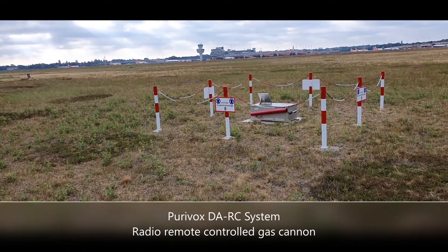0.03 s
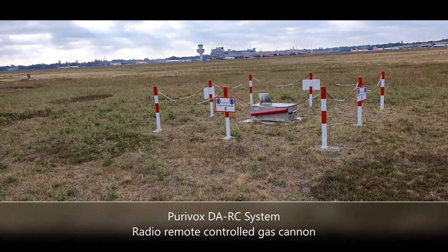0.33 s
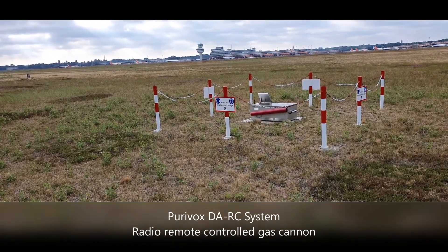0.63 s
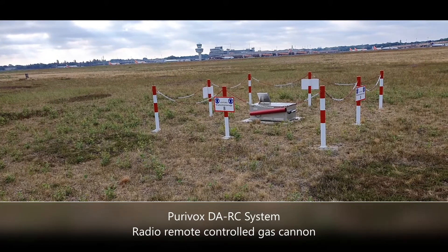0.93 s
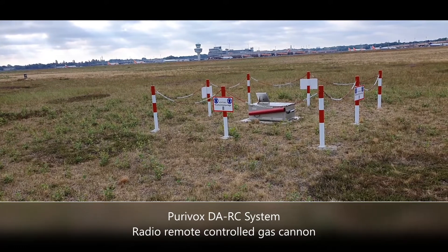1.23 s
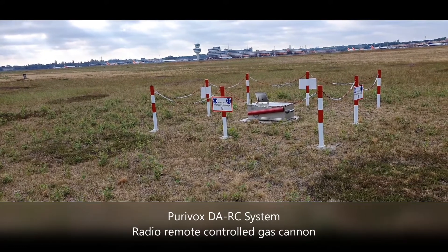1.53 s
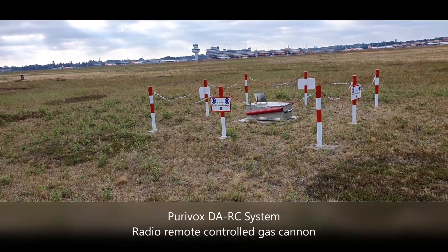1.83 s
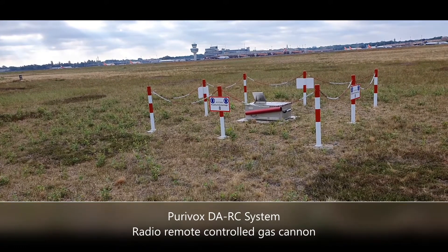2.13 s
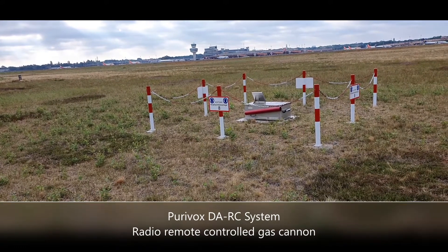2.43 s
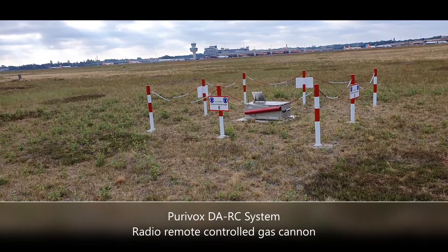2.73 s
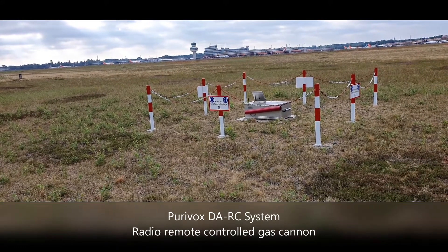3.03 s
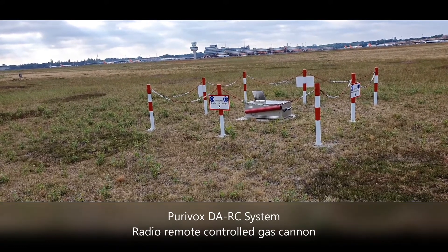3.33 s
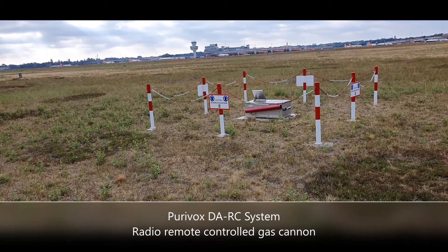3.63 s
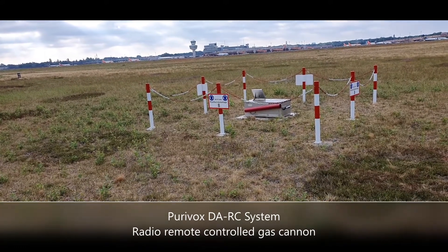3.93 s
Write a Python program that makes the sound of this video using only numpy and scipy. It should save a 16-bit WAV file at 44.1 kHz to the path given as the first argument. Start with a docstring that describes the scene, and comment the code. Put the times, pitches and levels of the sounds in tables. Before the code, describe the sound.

A gas cannon fires one loud bang outdoors, after wind rumble and faint hissing.

```python
"""A gas cannon fires once on an open airfield, a few metres away. A valve clicks and gas hisses into the
barrel; ignition puffs, a shock wave cracks, the air column booms and the steel rings in its normal modes.
Ground and nearby objects reflect the bang, which overloads the microphone and lowers a limiter's gain.
The valve opens again and gas flows. Turbulent wind buffets the microphone over a far roar and a bird."""
import sys
import numpy as np
from scipy import signal
from scipy.fft import rfft, irfft
from scipy.io import wavfile
from scipy.ndimage import uniform_filter1d, minimum_filter1d

SR = 44100
rng = np.random.default_rng(int(sys.argv[2]) if len(sys.argv) > 2 else 0)


def log_audio(samples):
    """Write samples as a 16-bit WAV file to the path given in sys.argv[1]."""
    # one column per channel
    frames = np.atleast_2d(samples).T
    # limit to full scale, then quantise
    limited = np.clip(frames, -1, 1)
    pcm = np.round(limited * 32767).astype(np.int16)
    wavfile.write(sys.argv[1], SR, pcm)


N = 176400
T = np.arange(N) / SR
FIRE_S = 3.2593  # arrival of the shock


def undb(db):
    """Amplitude ratio of a level in decibels."""
    return 10 ** (np.asarray(db) / 20)


def pan(db):
    """Stereo gains for a level difference, left minus right."""
    return undb(np.array([[db], [-db]]) / 2)


def noise(gain, coherent_hz):
    """Spectrally shaped stereo noise of unit rms; the channels lose coherence above coherent_hz."""
    f = np.arange(N // 2 + 1) * SR / N + 1e-3
    coherence = 1 / (1 + (f / coherent_hz) ** 2)
    mid, side = rfft(rng.standard_normal((2, N))) * gain(f)
    x = irfft(mid * np.sqrt(1 + coherence) + side * np.sqrt(1 - coherence) * np.array([[1], [-1]]), N)
    return x / np.sqrt(np.mean(x ** 2))


def spectrum(points):
    """Spectral envelope through (frequency [Hz], level [dB]) points, falling 12 dB per octave outside."""
    hz, db = np.array(sorted(points)).T
    return lambda f: (undb(np.interp(np.log(f), np.log(hz), db))
                      * np.minimum(f / hz[0], 1) ** 2 * np.minimum(hz[-1] / f, 1) ** 2)


def resonance(f, hz, width):
    """Magnitude response of a damped resonator."""
    return 1 / np.hypot(1, (f * f - hz * hz) / (f * width))


def flutter(per_s):
    """Smooth random fluctuation of unit standard deviation."""
    hold = int(SR / per_s)
    steps = np.repeat(rng.standard_normal(N // hold + 1), hold)
    x = uniform_filter1d(uniform_filter1d(steps, hold), hold)[:N]
    return x / x.std()


def decay(start, t60, attack=.00034):
    """Quick rise, then exponential damping by 60 dB in t60 seconds."""
    age = np.maximum(T - start, 0)
    return (1 - np.exp(-age / attack)) * np.exp(-np.log(1000) * age / t60)


def swell(at, width):
    """Gaussian envelope."""
    return np.exp(-((T - at) / width) ** 2)


def delay(x, seconds):
    """Propagation delay of one channel."""
    return np.interp(T - seconds, T, x)


def ring(modes, start):
    """Free vibration: damped modes excited together, neighbours in opposite phase."""
    return sum((-1) ** k * undb(db) * decay(start, t60, attack=.0002)
               * np.sin(2 * np.pi * hz * (T - start)) for k, (hz, db, t60) in enumerate(modes))


def snaps(rows):
    """Damped bursts of band noise, from the right."""
    return pan(-3.5) * sum(undb(db) * decay(at, t60) * noise(lambda f: resonance(f, hz, .25 * hz), 2500)
                           for at, db, hz, t60 in rows)


def blast(start, length):
    """Friedlander wave: an overpressure of the given length sinks into a longer suction."""
    age = np.maximum(T - start, 0) / length
    return uniform_filter1d((T > start) * (1 - age) * np.exp(-age), size=6)


PUFF_S, PUFF_WIDTH_S, SHOCK_LENGTH_S = 3.2464, .0014, .00047
# modes of the barrel's air column (frequency [Hz], level [dB], T60 [s])
BARREL_MODES = [(68.2, 1.5, 0.125), (146, 12, 0.042), (247, -1.5, .1), (570, -1, 0.036), (1187, -1, 0.046),
                (1404, -6, 0.043), (2270, -10, .06)]
# deep swing of the displaced air (frequency [Hz], level [dB], T60 [s])
THUMP_MODES = [(42, -9.5, .17)]


def muzzle_blast():
    """Sudden expansion: ignition pushes air ahead of a shock, which excites the barrel's air column."""
    u = (T - PUFF_S) / PUFF_WIDTH_S
    puff = undb(-12.5) * (u * u - 1) * np.exp(-u * u / 2)
    shock = undb(18) * blast(FIRE_S, SHOCK_LENGTH_S)
    rebound = undb(-9) * blast(3.2627, length=.004)  # the collapsing gas springs back
    boom = ring(BARREL_MODES, FIRE_S + SHOCK_LENGTH_S) - ring(THUMP_MODES, FIRE_S + SHOCK_LENGTH_S)
    front = puff + shock + rebound + boom
    return np.array([delay(front, .00004), front])  # the right microphone port is nearer


# turbulence at the muzzle (frequency [Hz], relative spectral level [dB])
CRACK_SPECTRUM = [(450, -7), (780, -25), (1300, -6.5), (2200, -11), (2900, -18.5), (4200, -11),
                  (6500, -14.5), (8000, -28), (11500, -25), (15500, -31)]


def muzzle_crack():
    """Turbulent gas radiates noise that interferes with its inverted reflection from soft ground."""
    rush = undb(-9) * np.exp(-np.abs(T - FIRE_S) / .00063)
    sizzle = undb(-47) * swell(PUFF_S + PUFF_WIDTH_S, .005)  # burning gas behind the puff
    tail = undb(1.5) * decay(FIRE_S, t60=.031)
    direct = (rush + sizzle + tail) * noise(spectrum(CRACK_SPECTRUM), coherent_hz=3000)
    reflected = undb(-3.5) * np.array([delay(channel, .00115) for channel in direct])
    return (direct - reflected) * pan(-5.3)


# modes of the steel wall (frequency [Hz], level [dB], T60 [s])
STEEL_MODES = [(315, -33, .55), (1139, -57, 2.7), (1166, -58, 2.8), (1588, -55, .7), (3235, -41.5, .5),
               (3266, -31, 0.63)]


def barrel_steel():
    """Impulse excitation: the shot leaves the lightly damped steel ringing."""
    return ring(STEEL_MODES, FIRE_S) * pan(-2)


# sound scattered by the ground (frequency [Hz], relative spectral level [dB])
SCATTER_SPECTRUM = [(95, -16), (135, 2), (220, 0.5), (380, -14), (740, -17), (906, -12.5), (1330, -23),
                    (2210, -14.5), (3890, -22), (5390, -18.5), (6020, -25.5), (15500, -34)]


def ground_scatter():
    """Diffuse scattering: patches of ground return the bang as a rough tail."""
    tail = undb(.3) * decay(FIRE_S, t60=.168, attack=.025)
    scattered = noise(spectrum(SCATTER_SPECTRUM), coherent_hz=2000) * pan(-1.5)
    return tail * scattered * undb(2.5 * flutter(per_s=700))


# posts, signs and housing (time [s], level [dB], centre frequency [Hz], T60 [s])
NEAR_ECHOES = [(3.2641, -8.5, 4460, .012), (3.2867, -6.5, 2900, .03), (3.3098, -11.5, 2357, .025),
               (3.3184, -6, 5070, .016), (3.3315, -20, 5000, .02)]
# returns from across the field (time [s], level [dB])
DISTANT_ECHOES = [(3.465, -21), (3.606, -37), (3.865, -41)]


def echoes():
    """Reflection: near objects answer sharply; distant returns come late and dull, adding in power."""
    near = snaps(NEAR_ECHOES)
    power = sum((undb(db) * decay(at, t60=.14, attack=.0034)) ** 2 for at, db in DISTANT_ECHOES)
    dull = noise(lambda f: resonance(f, hz=120, width=150) ** 3, coherent_hz=600)
    return near + np.sqrt(power) * dull


# reverberation of the field (frequency [Hz], relative spectral level [dB])
ROLL_SPECTRUM = [(24, -60.5), (40, -34), (81, -2.5), (193, -3), (309, -9.5), (444, -33), (1060, -36.5),
                 (1170, -26), (2200, -46)]


def field_roll():
    """Reverberation: the bang rolls on over the field as a low, decaying rumble."""
    tail = undb(-20) * decay(FIRE_S, t60=.85, attack=.015)
    return tail * noise(spectrum(ROLL_SPECTRUM), coherent_hz=700)


# loose metal parts (time [s], level [dB], centre frequency [Hz], T60 [s])
METAL_TICKS = [(3.4565, -51, 13500, .03), (3.463, -55, 6500, .05), (3.527, -53, 5500, .025)]


def housing():
    """Damped vibration: the shaken housing rattles finely as it settles and loose parts tick."""
    settling = undb(-45.5 + 2 * flutter(per_s=700)) * decay(FIRE_S, t60=.8)
    rattle = noise(spectrum([(2000, 0), (6500, -2), (15000, -13)]), coherent_hz=2000)
    return settling * rattle * pan(-6) + snaps(METAL_TICKS)


# openings of the valve (time [s], level [dB], T60 [s])
VALVE_CLICKS = [(1.902, -60.5, 0.18), (3.623, -48.5, .08)]
# one click (frequency [Hz], relative spectral level [dB])
CLICK_SPECTRUM = [(1760, -44), (3000, -8), (5530, -8), (7800, -14), (11200, 0), (13500, -12), (15500, -30)]


def valve():
    """Transient excitation: each opening gives a bright, quickly damped click."""
    clicks = sum(undb(db) * decay(at, t60, attack=.00067) for at, db, t60 in VALVE_CLICKS)
    return clicks * noise(spectrum(CLICK_SPECTRUM), coherent_hz=1500) * pan(-6)


# fillings (start [s], end [s], jet level [dB], barrel level [dB], airy hiss level [dB])
GAS_FLOWS = [(1.903, 3.122, -77.8, -78.5, -98), (3.63, 4.1, -69.5, -70, -68)]
# hiss of the jet (frequency [Hz], relative spectral level [dB])
JET_SPECTRUM = [(2000, -20), (3500, -2), (4300, 7), (6700, -4), (7600, -40), (9500, -17), (10700, -1.5),
                (11600, 2.5), (13000, -6.5), (15500, -12)]
# resonances of the blown barrel (frequency [Hz], width [Hz], relative level [dB])
BLOWN_MODES = [(1175, 64, 4.5), (1630, 100, -10), (2240, 160, 0)]
# broad airy hiss (frequency [Hz], relative spectral level [dB])
AIR_SPECTRUM = [(2800, -2), (6700, -1), (7900, -13), (9800, 0), (15000, 2)]
OPENING_S, CLOSING_S = .025, .05


def gas_flow():
    """Jet noise and forced resonance: flowing gas hisses, blows the barrel's modes and drones."""
    jet = undb(flutter(per_s=14)) * noise(spectrum(JET_SPECTRUM), coherent_hz=1500) * pan(-10)
    barrel = noise(lambda f: sum(undb(db) * resonance(f, hz, width) ** 2
                                 for hz, width, db in BLOWN_MODES), coherent_hz=2500)
    air = noise(spectrum(AIR_SPECTRUM), coherent_hz=1500)
    drone = undb(-67.5) * noise(lambda f: resonance(f, hz=284, width=45) ** 2, coherent_hz=600)
    out = 0
    for start, end, jet_db, barrel_db, air_db in GAS_FLOWS:
        flow = np.clip((T - start) / OPENING_S, 0, 1) * np.clip((end - T) / CLOSING_S + 1, 0, 1)
        out += flow * (undb(jet_db) * jet + undb(barrel_db) * barrel + undb(air_db) * air + drone)
    return out * pan(-2)


# gusts and lulls (time [s], half width [s], change in wind level [dB], eddy level [dB])
WIND_GUSTS = [(0.142, 0.062, 13, -35.5), (0.369, 0.044, 11, -52), (.49, 0.055, 13, -48),
              (1.03, 0.065, -13, -80), (2.12, 0.1, -2, -59)]
# rumble at the ports (frequency [Hz], relative spectral level [dB])
WIND_SPECTRUM = [(20, -7.5), (47, -2.5), (69, 3), (146, -10.5), (173, -15), (260, -22), (340, -44)]


def wind():
    """Turbulent pressure: gusts rumble on the microphone ports, shed finer eddies and stir the grass."""
    gust_db = sum(db * swell(at, width) for at, width, db, _ in WIND_GUSTS)
    force = undb(gust_db + 2 * flutter(per_s=22))
    rumble = undb(-52) * force * noise(spectrum(WIND_SPECTRUM), coherent_hz=45) * pan(1.3)
    shedding = sum(undb(db) * swell(at, width) for at, width, _, db in WIND_GUSTS)
    eddies = shedding * noise(lambda f: resonance(f, hz=125, width=143) ** 3, coherent_hz=116)
    grass = undb(-80.5) * force * noise(spectrum([(850, 0), (4000, -13)]), coherent_hz=1500)
    return rumble + eddies + grass


# buffets on the ports (time [s], level [dB], left minus right [dB], lag of the left port [s])
WIND_BUFFETS = [(0.151, -4.5, 0, .0045), (.447, -12, -1.5, 0), (2.099, -22, -2, .002),
                (2.468, -27, 3, .002), (2.595, -23, 16, 0)]
BUFFET_HZ = 84


def buffets():
    """Damped pressure oscillation: single buffets of wind thump on the microphone ports."""
    out = 0
    for at, db, pan_db, lag in WIND_BUFFETS:
        arrival = at + np.array([[lag], [0]])
        swing = np.sin(2 * np.pi * BUFFET_HZ * (T - arrival))
        out -= undb(db) * pan(pan_db) * decay(arrival, t60=.075, attack=.015) * swing
    return out


# roar of the airfield (frequency [Hz], relative spectral level [dB])
ROAR_SPECTRUM = [(120, -39.5), (200, -10.5), (304, -15), (437, -14), (497, -8.5), (607, -2), (957, -15.5),
                 (1260, -11.5), (2020, -21.5), (2700, -19.5), (3420, -31), (4840, -36.5), (5910, -39.5),
                 (6710, -29), (7620, -48.5), (15500, -41)]


def distant_roar():
    """Stationary noise: the airfield roars steadily, far away."""
    return undb(-62.1) * noise(spectrum(ROAR_SPECTRUM), coherent_hz=1700)


# calls of a far bird (time [s], level [dB])
BIRD_CHIRPS = [(2.0, -73), (2.09, -70.5), (3.19, -75)]


def bird():
    """Amplitude modulation: brief swells of a high noise band make thin, raspy chirps."""
    rasp = noise(lambda f: resonance(f, hz=5300, width=980) ** 3, coherent_hz=6200)
    return rasp * sum(undb(db) * swell(at, width=.012) for at, db in BIRD_CHIRPS)


def scene():
    """Superposition: the pressures of all sources add at the microphone."""
    shot = muzzle_blast() + muzzle_crack() + barrel_steel()
    returns = ground_scatter() + echoes() + field_roll()
    machinery = housing() + valve() + gas_flow()
    return shot + returns + machinery + wind() + buffets() + distant_roar() + bird()


OVERLOAD_DB, CEILING_DB, RECOVERY_DB_PER_S = 20, -.5, .5
LOW_CUT_HZ, HIGH_CUT_HZ = 28, 15800


def record(dry):
    """Saturation and band limiting, with a limiter that clamps at once and recovers slowly."""
    x = undb(OVERLOAD_DB) * np.tanh(dry / undb(OVERLOAD_DB))
    x = signal.sosfilt(signal.butter(2, LOW_CUT_HZ, "highpass", fs=SR, output="sos"), x)
    excess_db = np.maximum(20 * np.log10(np.abs(x).max(axis=0) + 1e-9) - CEILING_DB, 0)
    held_db = np.maximum.accumulate(excess_db + RECOVERY_DB_PER_S * T) - RECOVERY_DB_PER_S * T
    gain = uniform_filter1d(minimum_filter1d(undb(-held_db), size=121), size=61)
    return signal.sosfilt(signal.ellip(10, .2, 80, HIGH_CUT_HZ, fs=SR, output="sos"), x * gain)


dry = scene()
out = record(dry)
log_audio(out)
```